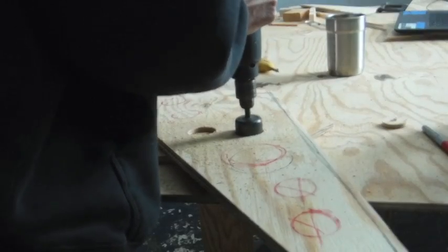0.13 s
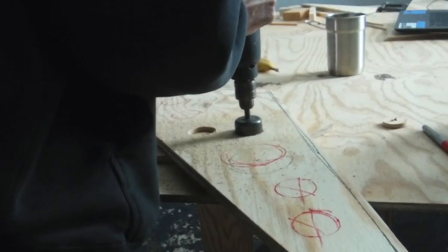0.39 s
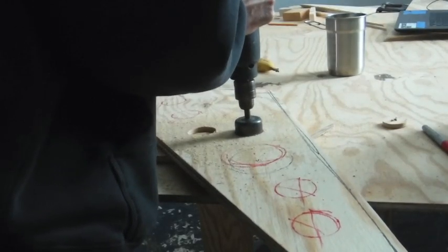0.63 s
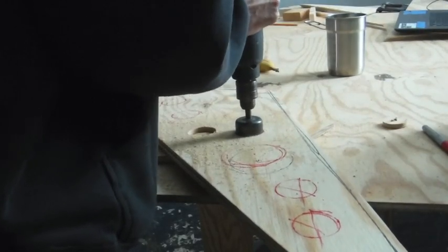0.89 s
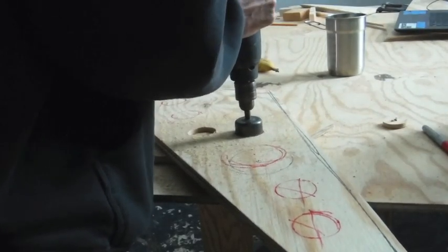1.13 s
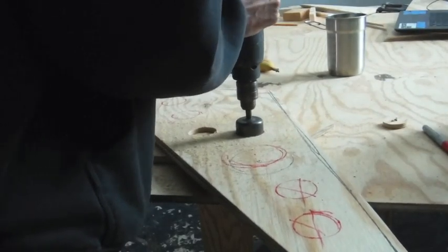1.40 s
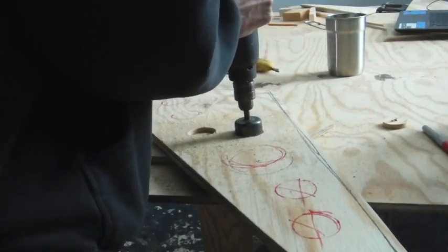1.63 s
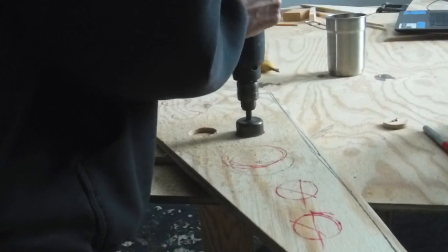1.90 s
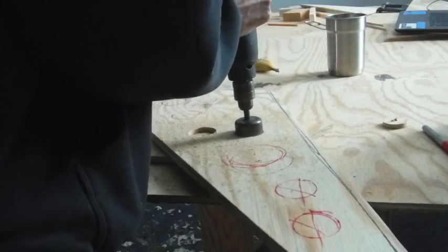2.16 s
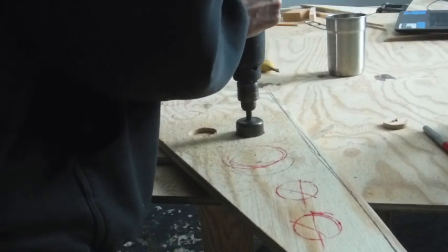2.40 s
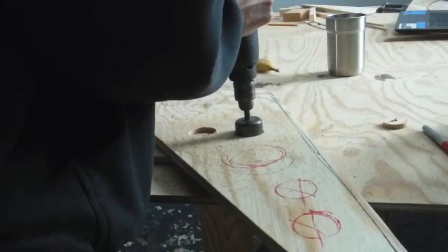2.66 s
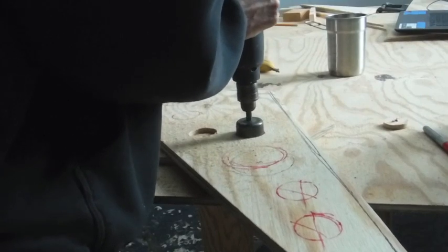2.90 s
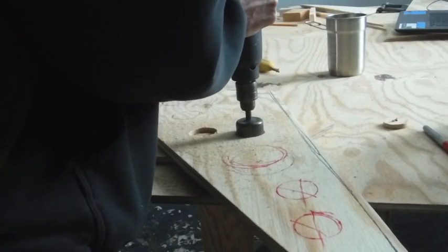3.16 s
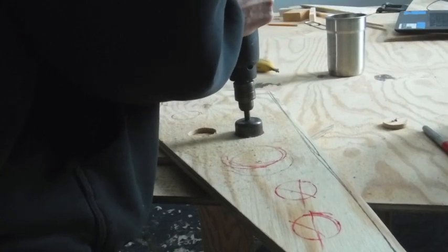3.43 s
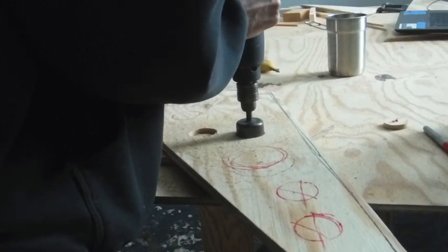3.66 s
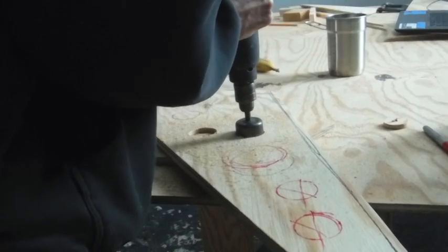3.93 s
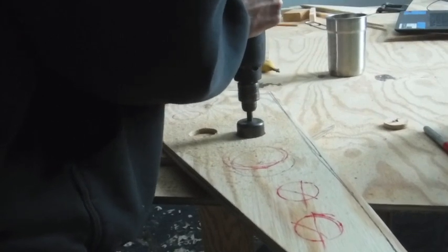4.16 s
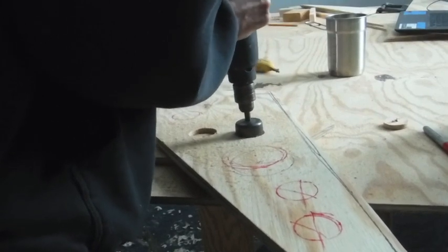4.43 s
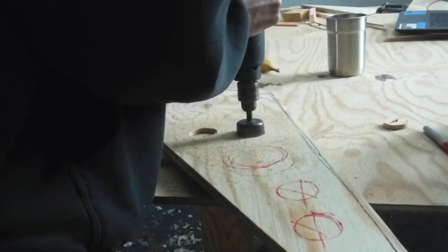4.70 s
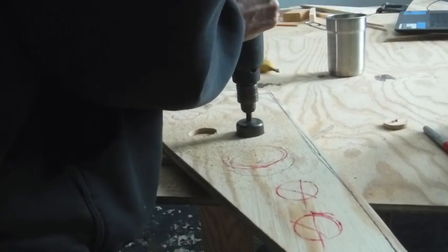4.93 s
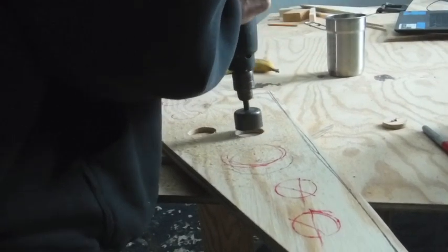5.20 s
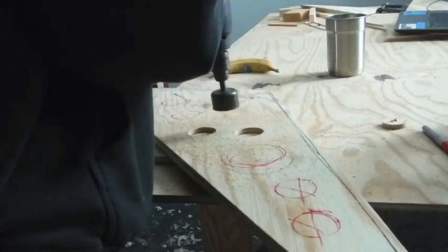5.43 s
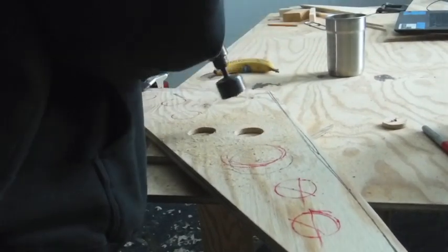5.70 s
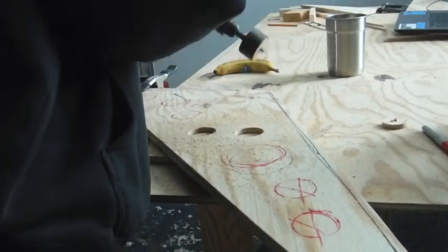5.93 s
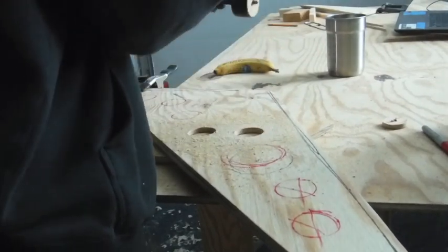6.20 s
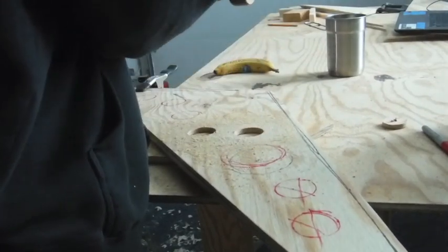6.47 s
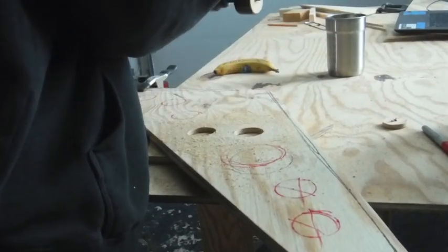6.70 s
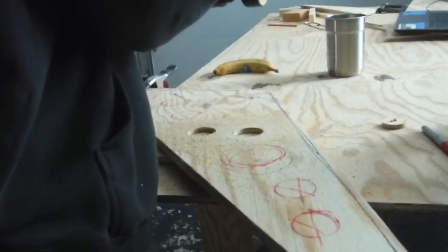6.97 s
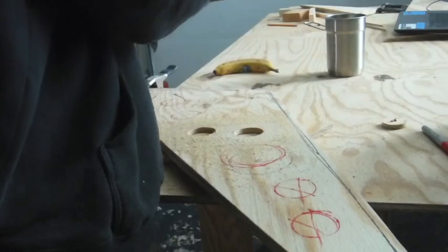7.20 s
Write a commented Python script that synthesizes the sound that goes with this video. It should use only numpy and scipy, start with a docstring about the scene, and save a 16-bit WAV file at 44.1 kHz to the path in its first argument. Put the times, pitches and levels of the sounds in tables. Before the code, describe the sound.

A corded drill spins a hole saw up into plywood, grinding with a harsh throbbing rasp, then breaks free and whines down to a few clicks.

```python
"""A hole saw cuts plywood in a garage: grainy noise from the teeth rings the board and the steel cup,
throbbing once a chuck turn, until the saw breaks through and is lifted out. The corded drill behind it
adds gear and commutator whines as sines locked to armature speed, with rattle and fan hiss as shaped noise;
they fall as the armature coasts down. Trigger clicks and bench jolts are short bursts through resonances,
and a decaying noise tail is the garage, over a quiet room floor."""
import sys
import numpy as np
from scipy import signal
from scipy.fft import rfft, irfft, next_fast_len
from scipy.io import wavfile
from scipy.ndimage import uniform_filter1d

SR = 44100
rng = np.random.default_rng(int(sys.argv[2]) if len(sys.argv) > 2 else 0)


def voltage_ratio(level):
    """Linear amplitude factor for a level in decibels (scalar or array-like)."""
    return 10 ** (np.asarray(level, float) / 20)


def dump(signal):
    """Clip the signal to [-1, 1] and save it as 16-bit WAV at the path in sys.argv[1]."""
    limited = np.clip(np.atleast_2d(signal).T, -1, 1)
    pcm = np.round(limited * 32767).astype(np.int16)
    wavfile.write(sys.argv[1], SR, pcm)


N = 323694
T = np.arange(N) / SR  # s

# Cut levels, before each layer's trims: start_s, wood_db, cup_db, rim_db
CUT_LEVELS = [(0.0, -64, -80, -71), (0.2, -57.5, -66, -58), (0.29, -53.5, -61, -57), (0.315, -48, -68, -57),
              (0.36, -53.5, -67, -56.5), (0.62, -47, -49, -46), (0.72, -46.5, -46, -42),
              (0.95, -45, -40.5, -39.5), (1.14, -43, -41, -37), (1.35, -44.5, -43.5, -38),
              (1.6, -41.5, -40.5, -36), (2.3, -43, -40.5, -35.5), (3.05, -43.5, -43, -36),
              (3.45, -42.5, -41, -35.5), (4.0, -43.5, -41.5, -35.5), (4.42, -44.5, -42.5, -37),
              (4.56, -43.5, -41, -34.5), (4.94, -45.5, -43, -37.5), (5.04, -53, -50.5, -45),
              (5.13, -58, -49, -44), (5.2, -54, -55, -44)]
# Saw bouncing, mostly before the kerf is deep: start_s, bounces_per_s, depth_db
CHATTER_CURVE = [(.45, 62.5, 4), (.58, 52.7, 4), (.72, 69, 9), (.82, 110, 5.5), (.95, 57, -2.5),
                 (1.1, 86, 2.5), (5.2, 74, 2)]
# Drill rocks and the teeth change their grip, mostly losing it: centre_s, change_db, half_length_s
GRIP_SLIPS = [(.95, -7, 0.048), (1.42, -15, 0.037), (1.67, -16.5, 0.037), (1.87, -23.5, 0.059),
              (2.14, -10.5, 0.028), (2.37, -13, 0.054), (2.82, -15, .05), (3.25, -9, 0.074),
              (3.64, -10.5, 0.082), (3.95, -11, 0.085), (4.11, 2, 0.041), (4.4, -11.5, 0.037)]
# Slow saw stalls on a fibre, then tears free: centre_s, dip_db, half_length_s
FIBRE_STALLS = [(.072, -8, 0.0063), (.184, -16, 0.0089), (.204, -10, 0.0046), (.302, -11, 0.0042),
                (.402, -5, 0.0035)]
# Rasp spectrum: frequency_hz, density_db (relative, per Hz)
RASP_SPECTRUM = [(150, -21.5), (280, -18), (410, -13.5), (820, -9), (1110, -4.5), (1860, -3.5), (2300, -7),
                 (2900, -23), (3760, 2.5), (5030, -7), (6170, -2.5), (8200, -15), (9500, -27), (12000, -50)]
# Plywood board modes: frequency_hz, width_hz, level_db (relative)
BOARD_MODES = [(406, 83, -15.5), (622, 72, -24.5), (1153, 110, -5), (1417, 240, -1), (1677, 130, -2),
               (1970, 190, 0.5), (2435, 440, 1), (2893, 600, -7.5)]
# Teeth biting into the wood, resonances: frequency_hz, width_hz, level_db (relative)
BITE_MODES = [(2575, 530, 1), (2963, 860, 3.5)]
# Steel cup boom, resonances: frequency_hz, width_hz, level_db (relative)
CUP_MODES = [(3663, 460, -7.5), (3903, 510, -8.5), (4220, 280, -25.5)]
# Toothed rim hiss, resonances: frequency_hz, width_hz, level_db (relative)
RIM_MODES = [(6120, 81, -8.5), (7930, 1030, -11.5), (9290, 1400, -1), (10186, 870, -2.5), (11064, 980, 6.5),
             (12300, 1000, -14), (14800, 1500, -45)]
# Bell-like ringing of the cup, resonances: frequency_hz, width_hz, level_db (relative)
BELL_MODES = [(6308, 74, -3), (11420, 110, -4)]
# Bench hum by multiple of chuck speed: sine_amplitude_db (over wood_db, before its wander and swells)
HUM_LEVELS = {"x3": -45, "x4": -34.5}
# Bench hum swells: chuck_multiple, centre_s, rise_db, half_length_s
HUM_RISES = [("x3", .93, 31, 0.051), ("x3", 1.92, 16, .1), ("x3", 3.79, 14, .05), ("x3", 4.78, 25, .04),
             ("x3", 5.03, 30, 0.08), ("x4", 3.4, 8.3, 0.095), ("x4", 3.68, 8.5, 0.13),
             ("x4", 4.09, 19, .14), ("x4", 4.58, 15, 0.14), ("x4", 4.85, 11, .05)]
# Bench rumble spectrum: frequency_hz, density_db (relative, per Hz)
RUMBLE_SPECTRUM = [(20, -7), (45, -11), (110, -10), (250, -2), (450, -31)]

# Armature speed while the trigger is held: start_s, speed_turns_per_s
HELD_SPEED = [(0.0, 85), (0.3, 160), (0.6, 225), (0.73, 257), (0.93, 314), (1.12, 343), (1.32, 366),
              (1.48, 375), (1.66, 376), (2.04, 374.5), (2.3, 368), (2.62, 364.8), (2.8, 370.5), (3.36, 378),
              (3.58, 366), (3.73, 367), (3.87, 359.5), (4.07, 367.5), (4.29, 357.5), (4.48, 366.5),
              (4.6, 366.5), (4.72, 351), (4.84, 348), (4.96, 354), (5.04, 342.3)]
# Whines by multiple of armature speed: loaded_db, free_db, free_slope_db_per_db (of speed);
# both levels are at 370 turns per second, before swells, wander and (free only) housing lift
WHINE_LEVELS = {"x5": (-58, -75, 2.1), "x9": (-61, -64, 1.7), "x10": (-49, -70, 1.6),
                "x12": (-66, -71, 1.3), "x14": (-75, -72, 1.5), "x15": (-66, -69, 1.0),
                "x20": (-61, -71, 2.1), "x24": (-66, -68, .6), "x25": (-57, -78, 1.5),
                "x29": (-59, -80, 2.1), "x35": (-49, -43, 4.8)}
# Whines swell or fade for a moment: armature_multiple, centre_s, change_db, half_length_s
WHINE_SWELLS = [("x9", 1.12, 14, .12), ("x9", 1.42, -15, .12), ("x9", 2.15, 7, .1), ("x5", .95, 9, .25),
                ("x5", 3.85, 7, .12), ("x5", 4.86, 9, .14), ("x10", 1.08, 9, .14), ("x10", 4.75, 4, .15),
                ("x25", 1.2, 5, .15), ("x25", 4.76, 8, .12), ("x35", .85, 9, .2), ("x35", 1.2, 4, .15),
                ("x35", 3.9, 5, .15), ("x35", 4.4, 4, .2), ("x35", 4.95, -12, .17)]
# Housing lift of the free whines: frequency_hz, lift_db
HOUSING_LIFT = [(500, -4), (1000, -4), (1500, -12), (1950, 1), (2350, 3), (2900, -7), (3800, 0), (4700, 3),
                (5400, -3), (6300, 0), (8500, 0), (11500, 0)]
# Motor noise, before the rattle's own trims: start_s, rattle_db, fan_db (over rattle_db)
MOTOR_NOISE = [(5.2, -58, 8.5), (5.856, -62, 4), (6.126, -64, 2), (6.784, -74.5, 3.5), (7.0, -82, 2)]
# Gear rattle spectrum: frequency_hz, density_db (relative, per Hz)
RATTLE_SPECTRUM = [(100, -34), (300, -17.5), (900, -9.5), (1400, -8), (1850, -13), (2400, -6.5), (3700, -4),
                   (5000, -8.5), (6500, -22)]
# Gear case resonances: frequency_hz, width_hz, level_db (relative)
GEARCASE_MODES = [(400, 250, -12), (700, 350, -10), (1350, 240, 0), (2500, 400, -7), (3700, 700, -3)]
# Fan hiss spectrum: frequency_hz, density_db (relative, per Hz)
FAN_SPECTRUM = [(2940, -22.5), (5000, -6), (5660, -6), (7090, -5.5), (8110, -7), (9050, -0.5), (9920, -0.5),
                (13300, -9.5), (15100, -25.5), (15700, -29)]

# Single teeth catching while the saw is slow: start_s, burst_db (before trim)
TOOTH_TICKS = [(0.0448, -38), (0.0574, -45), (0.062, -41), (0.0797, -43), (0.098, -31), (0.177, -31),
               (0.1965, -50), (0.197, -39), (0.2117, -37), (0.226, -34), (0.3075, -29.5), (0.4084, -47)]
# Trigger and housing clicks: start_s, burst_db (before trim), crack_db (over burst_db)
CLICK_EVENTS = [(6.17, -52, 0), (6.624, -53, -4), (6.91, -59, 0), (7.009, -62, -3), (7.0184, -54, -8),
                (7.022, -49.5, 6.5), (7.037, -47.5, -9), (7.179, -65, 4), (7.199, -65, -4)]
# Trigger body resonances: frequency_hz, width_hz, level_db (relative)
TRIGGER_MODES = [(1530, 600, -2), (2070, 600, 2.5), (3170, 790, 3), (3880, 1100, 4), (5060, 1200, -10),
                 (7000, 1500, -7)]
# Saw snags that jolt the bench: start_s, burst_db (before trim)
BENCH_JOLTS = [(1.039, -56), (1.129, -54), (1.547, -55), (2.198, -56), (3.799, -61)]
# Room floor spectrum: frequency_hz, density_db (relative, per Hz)
ROOM_SPECTRUM = [(24, -40.5), (40, -11), (101, -7), (147, -2.5), (1200, -5), (2070, -1), (7610, -13),
                 (10000, -4.5), (15700, -21)]

PINION_TEETH, GEAR_TEETH = 5, 46
FULL_SPEED = 370  # armature turns per second at which the whine levels hold
RASP_SLIP_SHARE = 0.13  # part of each grip change, in dB, that reaches the rasp
BITE_DB, BURIED_S, BURY_DB_PER_S = 1.5, 3.45, -10.5  # muffled once the teeth sink below the surface
BIND_S, BIND_WIDTH_S = 4.8, 0.18  # the saw binds as it breaks through
BELL_DB, BELL_SLOW_DB, BELL_SLOW_S = -9.5, 13, 1  # the cup rings more freely before the teeth are sunk
FRICTION_TURNS_PER_S2, FAN_DRAG_SPEED = 110.6, 406  # drag speed in turns per second
LOADED_DB_PER_DB = 5.5  # loaded whine level per dB of speed
RUNOUT_RAD = -1.2  # the mesh also lags once a chuck turn, favouring the lower sideband
GARAGE_T60_S, GARAGE_TREBLE_T60_S, GARAGE_DB = 0.63, 0.39, -7
ROOM_DB = -77  # rms
OVERLOAD = .095  # the microphone stage rounds peaks near this size


def level(x, db):
    """Scale to an rms level in dB."""
    return x * voltage_ratio(db) / np.sqrt(np.mean(x ** 2))


def columns(table):
    """Read every column of a timed curve at each sample."""
    start_s, *rest = np.transpose(table)
    return [np.interp(T, start_s, column) for column in rest]


def across(points, hz):
    """Read (Hz, dB) points on a log-frequency axis."""
    point_hz, point_db = np.transpose(points)
    return np.interp(np.log(hz + 1), np.log(point_hz), point_db)


def bumps(rows):
    """Sum bell-shaped dB changes of (centre s, dB, half length s)."""
    return sum(db * np.exp(-((T - s) / half) ** 2) for s, db, half in rows)


def bumps_of(name, rows):
    """Sum only the bell-shaped changes that carry this name."""
    return bumps([row[1:] for row in rows if row[0] == name])


def noise():
    """White noise over the whole scene."""
    return rng.standard_normal(N)


def walk(rate):
    """Random levels held 1 / rate s and smoothed twice; spread about 0.7."""
    hold = int(SR / rate)
    steps = np.repeat(rng.standard_normal(N // hold + 1), hold)
    return uniform_filter1d(uniform_filter1d(steps, hold), hold)[:N]


def colour(x, points):
    """Shape by a spectrum, to rms 1."""
    size = next_fast_len(N)
    gain = voltage_ratio(across(points, np.fft.rfftfreq(size, 1 / SR)))
    return level(irfft(rfft(x, size) * gain, size)[:N], 0)


def ring(x, peaks):
    """Excite a sum of steep resonances, each set to its own power; rms 1."""
    out = 0
    for hz, width, db in peaks:
        # two passes narrow the peak, so each is made wider
        b, a = signal.iirpeak(hz, hz / (1.5 * width), fs=SR)
        once = signal.lfilter(b, a, x)
        out = out + level(signal.lfilter(b, a, once), db)
    return level(out, 0)


def teeth(chuck, grab_db, once_db, twice_db, lag):
    """Grainy noise, as of tearing fibres or meshing gears, swelling once and twice a chuck turn."""
    grains = noise() * voltage_ratio(.9 * np.minimum(rng.exponential(size=N), 6))
    throb_db = once_db * np.cos(chuck - lag) + twice_db * np.cos(2 * chuck - lag)
    return grains * voltage_ratio(throb_db + grab_db)


def chatter():
    """The saw bounces on the board at an unsteady rate, so its grip swings in dB."""
    rate, depth_db = columns(CHATTER_CURVE)
    bounce = np.cos(2 * np.pi * np.cumsum(rate * (1 + 0.1183 * walk(30))) / SR)
    return depth_db * bounce * (1 + 0.09 * walk(38)) + 0.97 * walk(60)


def bench_hum(chuck):
    """The bench hums in sines at multiples of the chuck speed."""
    hum = 0
    for name, db in HUM_LEVELS.items():
        hum_db = db + 2.2 * walk(8) + bumps_of(name, HUM_RISES)
        hum = hum + voltage_ratio(hum_db) * np.sin(int(name[1:]) * chuck)
    return hum


def wood(chuck, grab_db):
    """Tearing fibres rasp, bite and excite the board modes; a groan joins as the saw binds."""
    slip_db = bumps(GRIP_SLIPS)
    rasp = colour(teeth(chuck, grab_db, 0.59, 0.23, 0.16), RASP_SPECTRUM)
    board = 0
    for hz, width, db in BOARD_MODES:
        # the pressure point wanders, so each board mode comes and goes
        mode = ring(teeth(chuck, grab_db, 3.5, 0.67, 0.67), [(hz, width, 0)])
        board = board + voltage_ratio(db + 3.4 * walk(9)) * mode
    surface = (rasp * voltage_ratio(-1.5) + board * voltage_ratio(-8.5)) * voltage_ratio(RASP_SLIP_SHARE * slip_db)
    bite_db = BITE_DB + slip_db + BURY_DB_PER_S * np.maximum(T - BURIED_S, 0)
    bite = ring(teeth(chuck, grab_db, 2.2, .6, .3), BITE_MODES) * voltage_ratio(bite_db)
    groan = ring(noise(), BOARD_MODES[1:2]) * np.exp(-((T - BIND_S) / BIND_WIDTH_S) ** 2)
    return surface + bite + groan * voltage_ratio(-16) + bench_hum(chuck)


def steel(chuck, grab_db):
    """The teeth boom the cup, hiss the rim and strike bell tones; steel feels the bouncing less."""
    _, cup_db, rim_db = columns(CUT_LEVELS)
    cup = ring(teeth(chuck, .7 * grab_db, 6, .3, .3), CUP_MODES)
    rim = ring(teeth(chuck, .5 * grab_db, 0.2, 0.59, 0.33), RIM_MODES)
    # slow teeth land one by one, fast ones merge
    chuck_step = np.gradient(chuck)
    landing = rng.random(N) < 2.5 * chuck_step
    blows = landing * noise() * voltage_ratio(.5 * grab_db) / chuck_step ** 0.35
    exit_scrape_db = bumps([(5.12, 6.7, .04)])
    slow_db = BELL_SLOW_DB * np.exp(-T / BELL_SLOW_S)
    bell_db = cup_db + BELL_DB + slow_db + 4.2 * walk(10) + exit_scrape_db
    bell = ring(blows, BELL_MODES) * voltage_ratio(bell_db)
    return cup * voltage_ratio(cup_db) + rim * voltage_ratio(rim_db) + bell


def bench_shake():
    """Low noise as the bench shakes, once the saw is up to speed and pressed home."""
    rumble = colour(noise(), RUMBLE_SPECTRUM) * voltage_ratio(7.4 * walk(12))
    rise = np.clip((T - .55) / 0.32, .1, 1)
    return rumble * voltage_ratio(-78.5) * rise * np.clip((5.05 - T) / .06, 0, 1)


def saw(chuck):
    """One set of teeth drives wood and steel together until the saw leaves the board."""
    grab_db = chatter()
    wood_db = columns(CUT_LEVELS)[0]
    cut = wood(chuck, grab_db) * voltage_ratio(wood_db) + steel(chuck, grab_db) * voltage_ratio(.3)
    # the teeth leave the wood as the saw is lifted out
    touch = np.clip((5.185 - T) / .02, 0, 1)
    return cut * voltage_ratio(bumps(FIBRE_STALLS)) * touch + bench_shake()


def speed():
    """Armature turns per second: held by the trigger, then slowed by bearing friction and fan drag."""
    release_s, start = HELD_SPEED[-1]
    held = uniform_filter1d(columns(HELD_SPEED)[0], size=SR // 20)
    # slowing = friction * (1 + (speed / drag speed) ** 2), which solves to a tangent
    angle = np.arctan(start / FAN_DRAG_SPEED) - FRICTION_TURNS_PER_S2 / FAN_DRAG_SPEED * (T - release_s)
    coasting = np.maximum(FAN_DRAG_SPEED * np.tan(np.minimum(angle, 1)), 20)
    return np.where(T < release_s, held, coasting)


def motor_whines(spin, turn, chuck, load, speed_db):
    """Gear and commutator orders: sines at multiples of armature speed, reshaped as the load lifts."""
    whines = 0
    for name, (load_db, free_db, slope) in WHINE_LEVELS.items():
        k = int(name[1:])
        loaded_db = load_db + LOADED_DB_PER_DB * speed_db
        coasting_db = free_db + slope * speed_db + across(HOUSING_LIFT, k * spin)
        db = load * loaded_db + (1 - load) * coasting_db + bumps_of(name, WHINE_SWELLS)
        flutter_db = (2.2 + .6 * load) * walk(18)
        # the big gear runs a little out of true, which puts sidebands on the mesh
        depth = .8 if k % PINION_TEETH == 0 and k < 30 else .3
        wobble = 1 + depth * np.cos(chuck - .3)
        lag = RUNOUT_RAD * (k == 2 * PINION_TEETH) * np.sin(chuck - .3)
        tone = np.sqrt(2) * np.sin(k * turn + lag + .7 * walk(40))
        whines = whines + voltage_ratio(db + flutter_db) * wobble * tone
    return whines * np.clip((7.0 - T) / 0.11, 0, 1)


def gear_rattle(chuck, load, speed_db):
    """Loose gears rattle; unloaded, their slack knocks the case once a chuck turn, harder at speed."""
    rattle = colour(teeth(chuck, 1.5 * walk(40), 0.34, 0.68, 0), RATTLE_SPECTRUM)
    knock = ring(teeth(chuck, 2.5 * walk(30), 4., 1.2, 0), GEARCASE_MODES) * voltage_ratio(4 + 1.5 * speed_db)
    return rattle * voltage_ratio(-3.0 - 0.63 * speed_db * (1 - load)) + knock * (1 - load)


def fan_hiss(chuck):
    """Fan air as shaped noise, with loose dust and brushes ticking now and then."""
    grit = 1 + 9 * (rng.random(N) < .0012) * rng.random(N)
    return colour(grit * teeth(chuck, 1.6 * walk(30) + 1.2 * walk(8), 2.8, 1.0, 0), FAN_SPECTRUM)


def motor(spin, turn, chuck):
    """Whines follow the speed; rattle and fan hiss carry on as the armature coasts."""
    rattle_db, fan_db = columns(MOTOR_NOISE)
    load = np.clip((5.1 - T) / .15, 0, 1)
    speed_db = 20 * np.log10(spin / FULL_SPEED)
    whines = motor_whines(spin, turn, chuck, load, speed_db)
    rough = gear_rattle(chuck, load, speed_db) + fan_hiss(chuck) * voltage_ratio(fan_db)
    spin_up = np.clip(spin / 330, 0, 1) ** 3 * (T < 2)
    fade_out = (T >= 2) * np.clip((7.08 - T) / 0.07, 0, 1)
    return whines + rough * voltage_ratio(rattle_db) * (spin_up + fade_out)


def hits(table, decay_s):
    """A short noise burst with exponential decay at each event."""
    out = np.zeros(N)
    out[[int(row[0] * SR) for row in table]] = [voltage_ratio(row[1]) for row in table]
    envelope = signal.lfilter([1], [1, -np.exp(-1 / (decay_s * SR))], out)
    return envelope * noise()


def strike(bursts, peaks):
    """Ring resonances with bursts, keeping the bursts' power."""
    return ring(bursts, peaks) * np.sqrt(np.mean(bursts ** 2))


def trigger_clicks():
    """Plastic clicks: a dry body plus a bright crack."""
    crack_events = [(s, db + crack_db) for s, db, crack_db in CLICK_EVENTS]
    crack = strike(hits(crack_events, 0.0012), [(10100, 1600, -2), (6860, 1900, -4)])
    body = strike(hits(CLICK_EVENTS, 0.0021), TRIGGER_MODES)
    return (body + crack) * voltage_ratio(-2)


def tooth_ticks():
    """Single catching teeth strike the bell, cup and rim resonances."""
    return strike(hits(TOOTH_TICKS, 0.0012), BELL_MODES + CUP_MODES + RIM_MODES) * voltage_ratio(-12)


def bench_thuds():
    """Snags jolt the bench: short bursts in low resonances."""
    return strike(hits(BENCH_JOLTS, 0.0035), [(55, 54, -4), (150, 240, 3)]) * voltage_ratio(2.5)


def garage(x):
    """Diffuse tail of hard walls, fading in over 8 ms; the treble dies sooner."""
    t = T[:SR // 2]
    diffuse = rng.standard_normal(len(t)) * np.clip(t / .008, 0, 1)
    low = signal.sosfilt(signal.butter(2, 5000, fs=SR, output="sos"), diffuse)
    low_tail = low * 1000 ** (-t / GARAGE_T60_S)
    treble_tail = 0.81 * (diffuse - low) * 1000 ** (-t / GARAGE_TREBLE_T60_S)
    tail = low_tail + treble_tail
    return signal.fftconvolve(x, tail / np.sqrt(np.sum(tail ** 2)))[:N]


def room_floor():
    """Steady shaped noise, the quiet floor of the garage."""
    return level(colour(noise(), ROOM_SPECTRUM), ROOM_DB)


def scene():
    """Saw, motor, clicks and thuds in the garage over its quiet floor."""
    spin = speed()
    turn = 2 * np.pi * np.cumsum(spin) / SR  # armature angle, radians
    chuck = turn * PINION_TEETH / GEAR_TEETH
    clicks = trigger_clicks()
    direct = saw(chuck) + motor(spin, turn, chuck) + clicks + bench_thuds() + tooth_ticks()
    # the clicks face away behind the body, so the room's share of them is larger
    wet = garage(voltage_ratio(GARAGE_DB) * direct + voltage_ratio(-8.0) * clicks)
    return (direct + wet + room_floor())[None]


def band_limit(x):
    """A steep low-pass at the top of the band."""
    return signal.sosfilt(signal.butter(12, 15880, fs=SR, output="sos"), x)


def record(dry):
    """The microphone stage rounds peaks, then a steep low-pass cuts the top above 15.7 kHz."""
    rounded = OVERLOAD * np.tanh(dry / OVERLOAD)
    low_pass = signal.ellip(8, .2, 60, 15700, fs=SR, output="sos")
    finished = signal.sosfilt(low_pass, rounded)
    return band_limit(finished)


dry = scene()
out = record(dry)
dump(out)
```